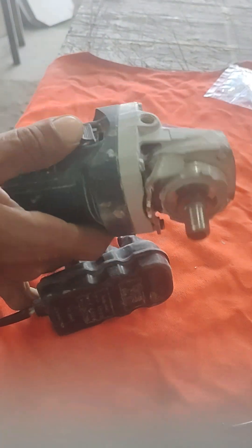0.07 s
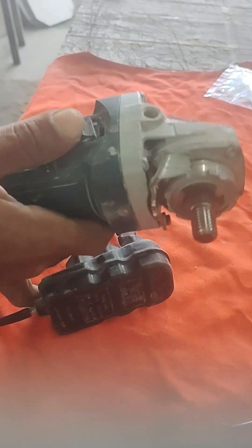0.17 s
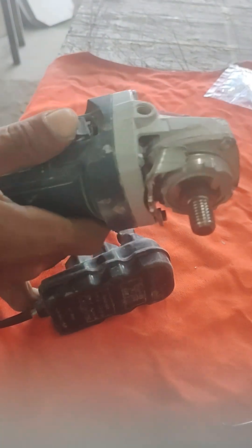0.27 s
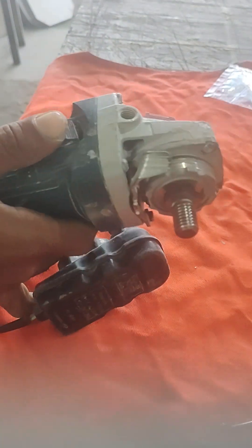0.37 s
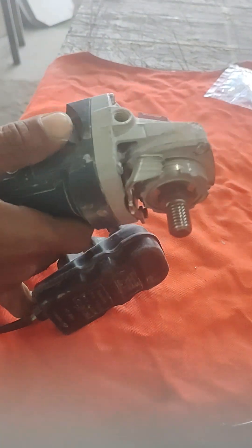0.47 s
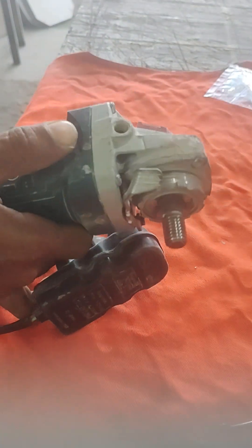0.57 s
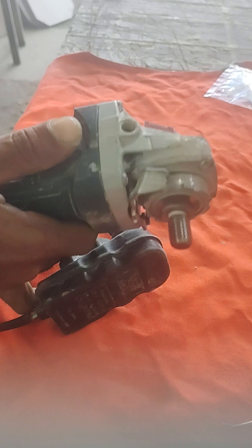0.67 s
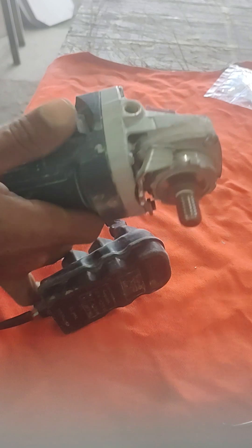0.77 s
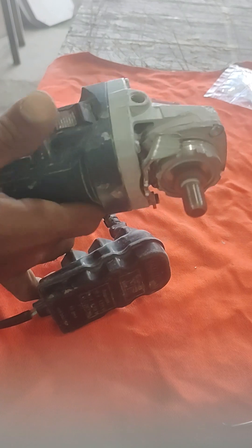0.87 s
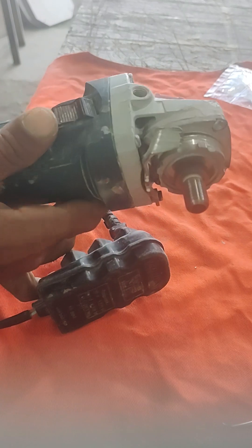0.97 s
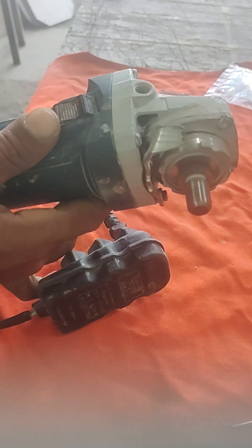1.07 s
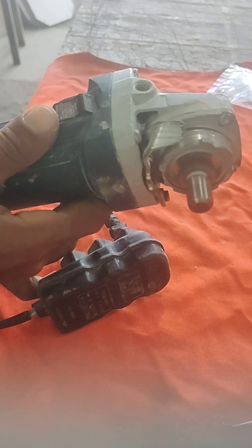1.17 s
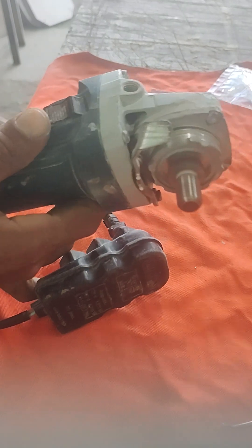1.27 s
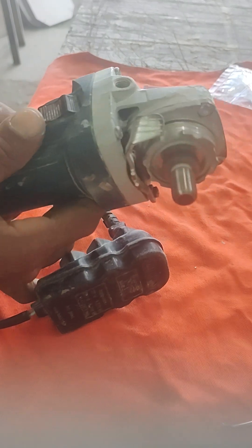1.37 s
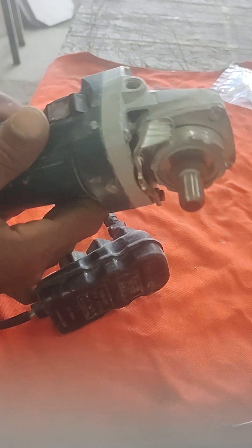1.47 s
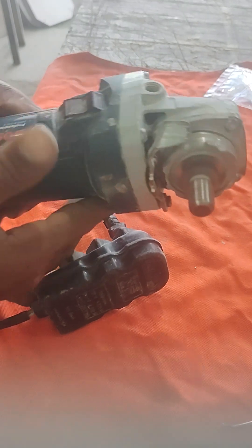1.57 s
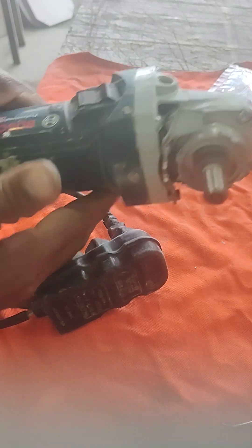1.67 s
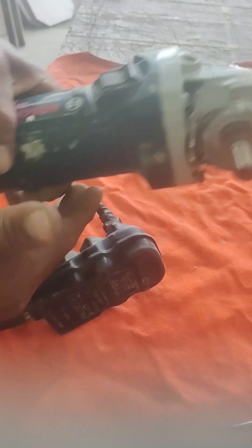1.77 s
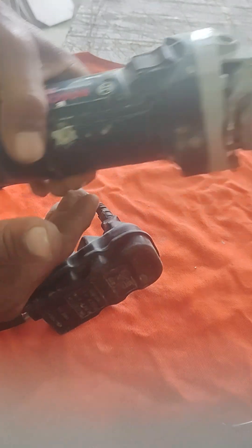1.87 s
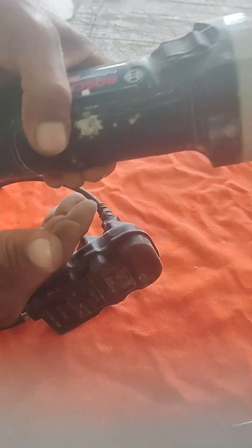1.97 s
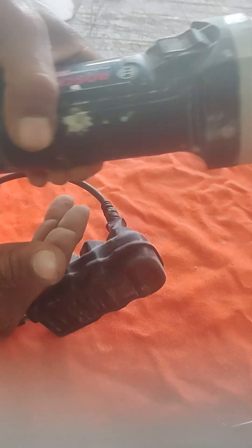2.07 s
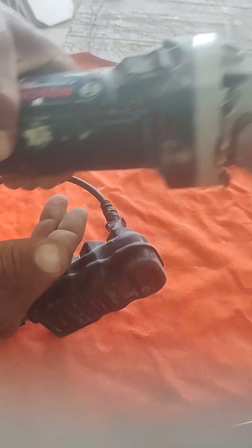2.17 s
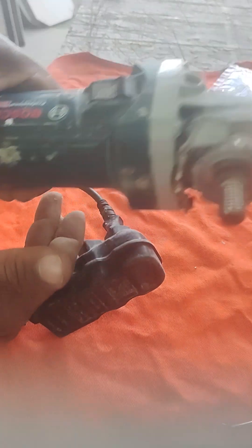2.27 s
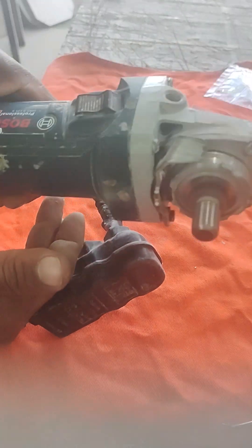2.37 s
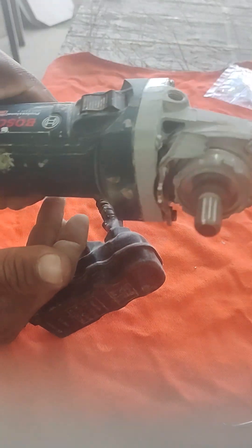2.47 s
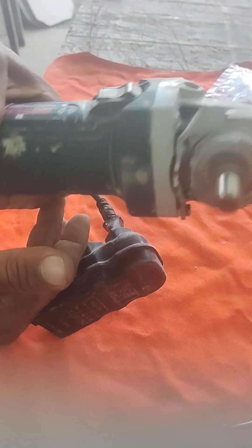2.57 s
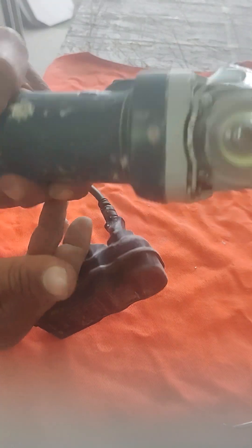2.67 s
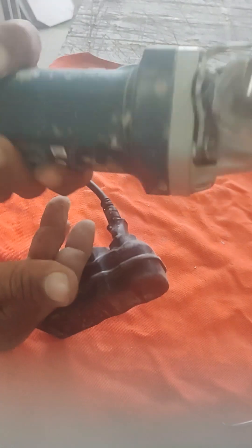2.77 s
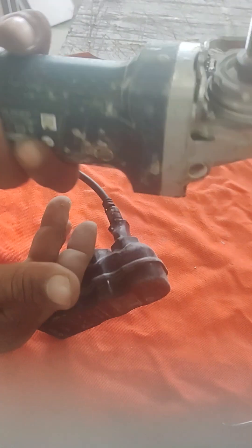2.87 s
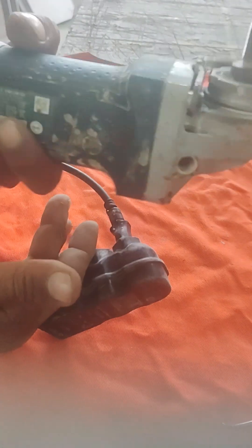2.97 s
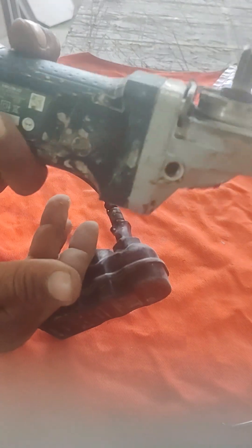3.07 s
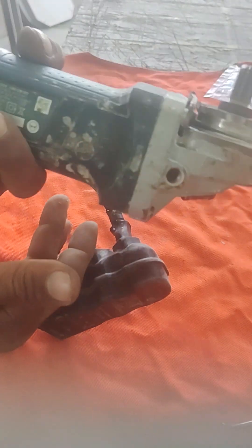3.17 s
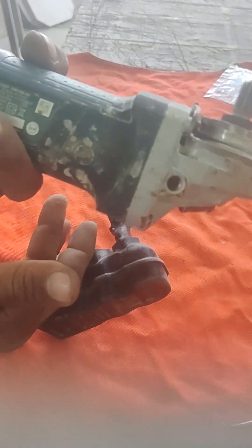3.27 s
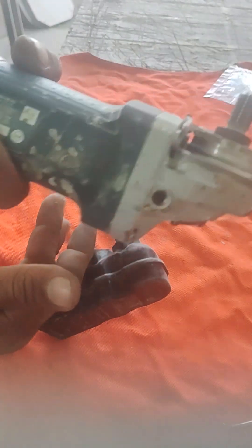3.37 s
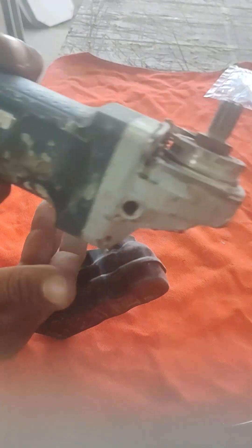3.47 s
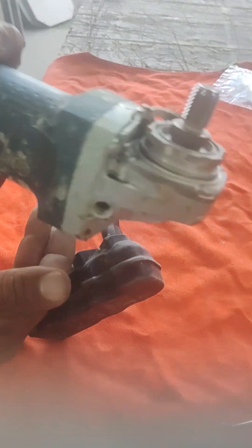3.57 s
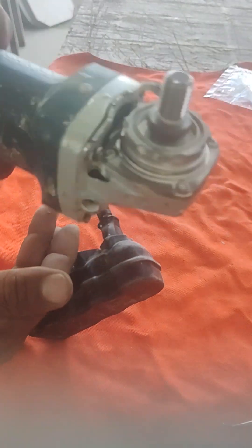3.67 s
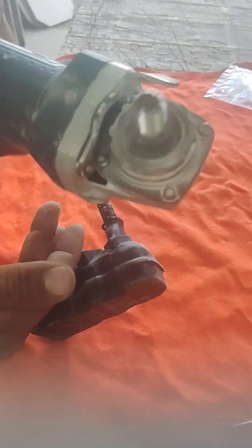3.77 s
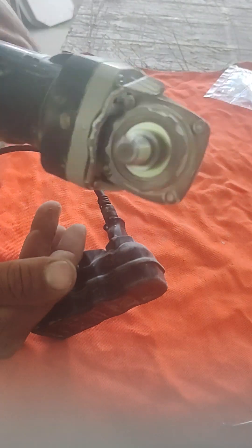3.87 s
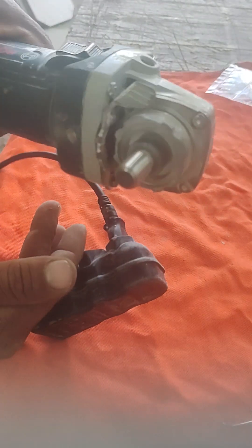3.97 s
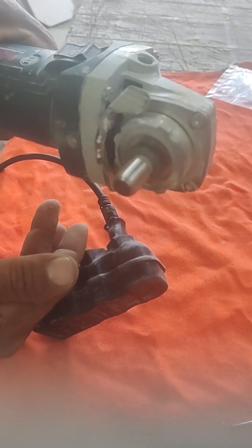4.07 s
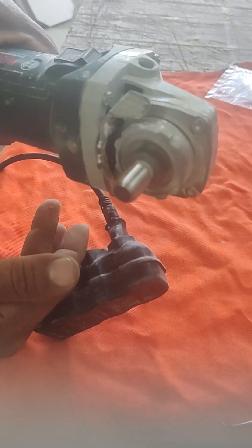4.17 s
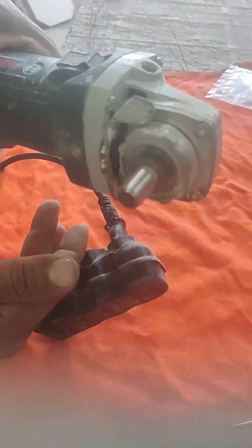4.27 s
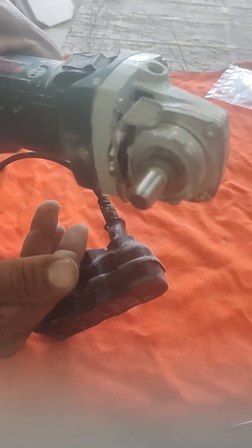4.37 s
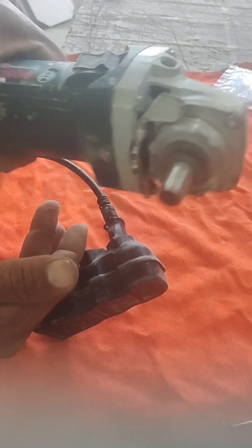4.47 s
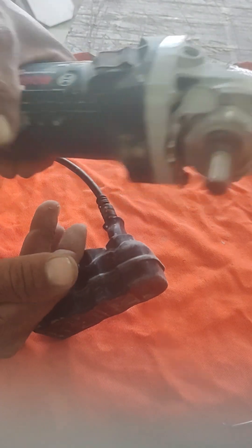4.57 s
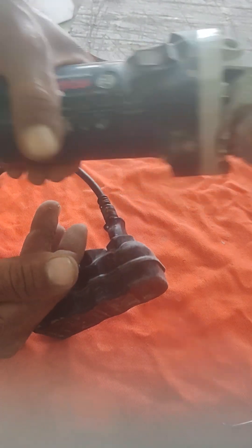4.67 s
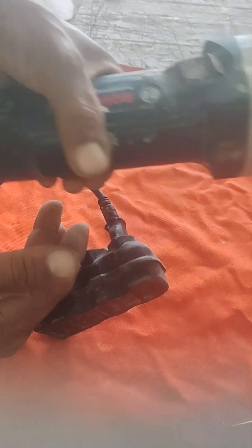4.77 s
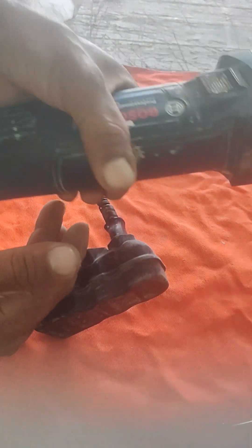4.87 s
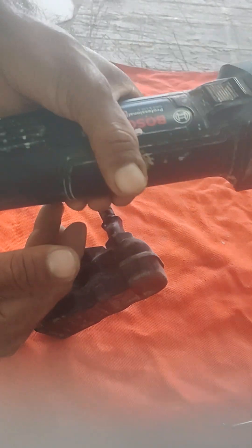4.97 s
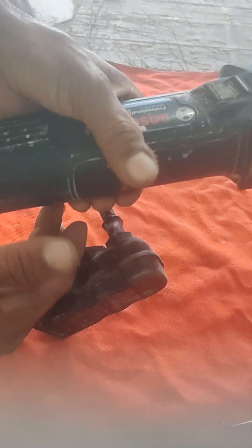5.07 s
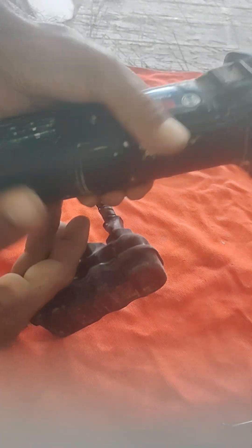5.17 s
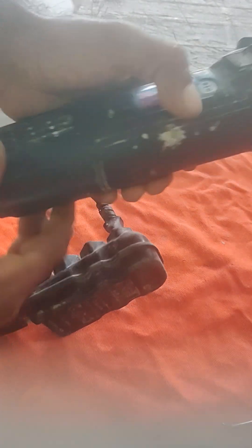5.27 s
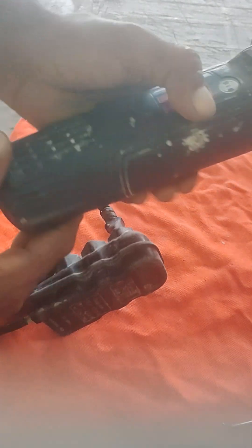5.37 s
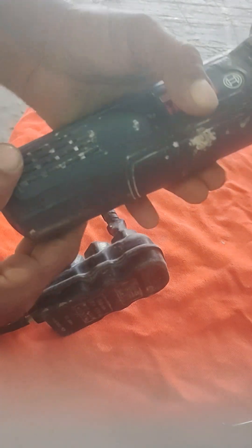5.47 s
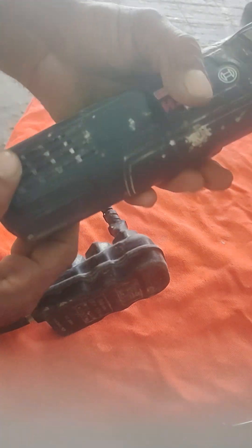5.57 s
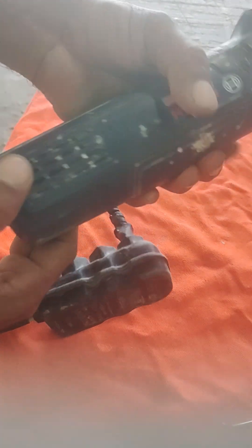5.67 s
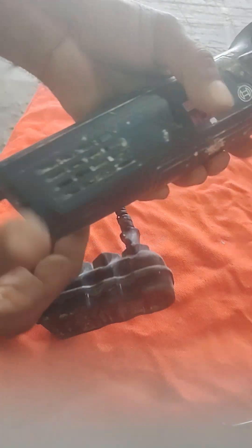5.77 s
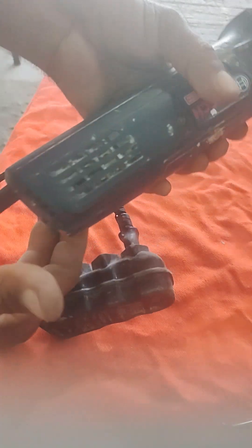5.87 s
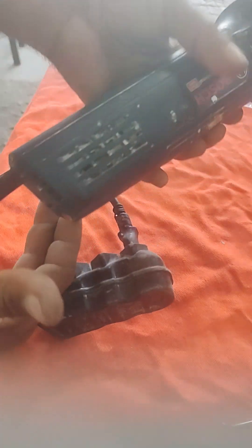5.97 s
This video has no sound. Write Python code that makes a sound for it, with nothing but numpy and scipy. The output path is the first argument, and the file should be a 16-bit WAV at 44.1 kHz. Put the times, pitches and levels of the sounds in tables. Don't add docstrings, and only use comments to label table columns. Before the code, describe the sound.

From 0 to 0.55 seconds a yard is nearly quiet: soft distant rumble, faint hiss, a thin cricket trill toward the right and a tiny far chirp near 0.3. Light finger clicks on a slide switch come at 0.02 and 0.2, with a slight scrape at 0.44. At 0.57 the switch snaps crisply, with quick plastic rebounds. Between 0.74 and 0.83 hard metallic gear knocks rattle as the motor of a discless angle grinder races up, buzzing and throbbing, reaching full speed around 1.1. It then runs very loud and close to the phone through 6 seconds: dense, bright rushing air, a piercing fan whine near ten kilohertz, grainy gear tones around three to four kilohertz and a hum near 420 hertz. Pitch sags slightly by 2 seconds and drifts; tones swell and shift between sides as the tool turns. A soft bump at 3.75 is mostly buried. It ends still running.

```python
import sys
import numpy as np
from scipy import signal
from scipy.fft import rfft, irfft, next_fast_len
from scipy.io import wavfile
from scipy.ndimage import uniform_filter1d, map_coordinates

SR = 44100
rng = np.random.default_rng(int(sys.argv[2]) if len(sys.argv) > 2 else 0)


def waveform_to_disk(signal):
    frames = np.transpose(np.atleast_2d(signal))
    scaled = np.clip(frames, -1, 1) * 32767
    samples = np.round(scaled).astype(np.int16)
    wavfile.write(sys.argv[1], SR, samples)


def undo_db(level):
    steps = np.asarray(level, float) / 20
    return 10 ** steps


N = 265041
T = np.arange(N) / SR
MAINS2_HZ = 120
TOP_HZ = 15750
START_S = .7

# (time [s], depth [0-1])
LOAD = [(.62, .3), (.75, .3), (.85, .4), (.93, .5), (.99, .5), (1.05, .2), (1.2, .08), (6.1, .055)]
# (time [s], amount)
END_ON = [(1.1, -0.11), (1.6, -0.16), (2.7, -0.053), (3.4, -0.64), (4.3, -0.51), (4.7, 0.44), (5.3, 1.1),
          (5.7, 1.85)]


def unit(x):
    return x / np.sqrt(np.mean(x ** 2, -1, keepdims=True) + 1e-20)


def along(points, hz):
    f, v = np.transpose(points)
    return np.interp(np.log(hz + 1), np.log(f + 1), v)


def curves(rows, before=None):
    s, *cols = np.transpose(rows)
    return np.array([np.interp(T, s, c, left=before) for c in cols])


def wobble(rate):
    coarse = T[::32]
    knots = rng.standard_normal(int(N * rate / SR) + 4)
    return np.interp(T, coarse, map_coordinates(knots, [coarse * rate]))


def filtered(x, response):
    m = next_fast_len(N + SR // 2)
    return irfft(rfft(x, m) * response(np.fft.rfftfreq(m, 1 / SR)), m)[..., :N]


def sides(db, pan_db):
    return db + np.array([[.5], [-.5]]) * pan_db


def wobble_pair(rate):
    return np.array([wobble(rate), wobble(rate)])


def rush(patchy_db):
    # (frequency [Hz], likeness [0-1])
    likeness = [(60, 1), (110, 1), (1230, 0.88), (1380, 0.18), (1550, 0.74), (2070, 0.72), (2800, 0.61),
                (3300, 0.45), (6000, 0.054), (7700, 0.043), (9000, 0.053)]
    # (frequency [Hz], phase [rad])
    echo_phase = [(550, -.2), (780, .4), (1050, 0), (1250, -.7), (1380, -2.6), (1550, -5), (2000, -5.9),
                  (2900, -6.5), (3300, -7.6)]
    lead_s = 16 / 44100
    z = signal.stft(rng.standard_normal((2, N)), nperseg=512)[2]
    field = uniform_filter1d(rng.standard_normal(z.shape), 4, 1)
    field = uniform_filter1d(field, 20, 2)
    pair = signal.istft(z * undo_db(patchy_db * field / field.std()), nperseg=512)[1][:, :N]

    def share(hz):
        angle = np.arccos(np.clip(along(likeness, hz), 0, 1)) / 2
        return np.array([np.cos(angle), np.sin(angle)])

    def delay(hz):
        phase = np.pi * hz * lead_s - along(echo_phase, hz) / 2
        return np.exp(1j * phase * np.array([[1], [-1]]))

    mid, side = filtered(pair, share)
    return filtered(np.array([mid + side, mid - side]), delay)


def clicks(events, modes, t60):
    out = np.zeros((2, N + SR))
    t = np.arange(SR // 8) / SR
    fade = undo_db(-60 * t / t60) + 0.17 * undo_db(-60 * t / 0.13)
    for s, db, pan_db in events:
        crack = fade * rng.standard_normal((2, len(t)))
        out[:, round(s * SR):][:, :len(t)] += undo_db(sides(db + 2.5, pan_db)) * crack

    def shell(f):
        total = 0
        for k, (c, w, db) in enumerate(modes):
            total = total + (-1) ** k * undo_db(db) * 1j * f * w / (c * c - f * f + 1j * f * w)
        return total

    return filtered(out[:, :N], shell)


def spin():
    half_speed_s, runup_s = .9, .083
    return 1 / (1 + np.exp((half_speed_s - T) / runup_s))


def speed():
    # (time [s], speed [turns per s])
    free_speed = [(1.05, 443.2), (1.31, 445.6), (1.49, 442.9), (1.93, 426.4), (2.49, 419.4), (2.63, 422.2),
                  (2.89, 424.8), (3.12, 424.8), (3.35, 418.7), (3.82, 416.0), (4.11, 417.3), (4.29, 426.0),
                  (4.52, 423.2), (4.81, 423.9), (5.01, 420.1), (5.24, 422.2), (5.77, 414.8), (6.01, 419.1)]
    return curves(free_speed)[0] * spin()


def throb():
    return 1 + np.clip(curves(LOAD)[0], 0, 1) * np.cos(2 * np.pi * MAINS2_HZ * T - 2)


def yard():
    # (frequency [Hz], level [dB per Hz])
    quiet = [(24, -28), (40, -7), (64, -2), (179, -9.5), (310, -5), (352, -8), (595, -12), (1170, -16),
             (2410, -22), (4730, -22), (5360, -17), (6550, -26), (15700, -37)]
    # (time [s], level [dB])
    cricket = [(0, -73), (.1, -79), (.2, -86), (.35, -72), (.55, -75), (.8, -75)]
    # (time [s], base pitch [Hz], level [dB])
    squeak = [(.25, 3480, -99), (.28, 3720, -90), (.31, 3840, -87), (.34, 3720, -90), (.375, 3450, -99)]
    calm = filtered(rush(patchy_db=1.2), lambda hz: undo_db(along(quiet, hz)))
    floor = undo_db(-67.0) * unit(calm) * undo_db([[-1.2], [1.2]])

    noise = rng.standard_normal((2, N))
    song = unit(filtered(noise, lambda hz: 1 / (1 + ((hz - 5340) / 70) ** 2)))
    trill = undo_db(3 * np.sin(2 * np.pi * 45 * T))
    song = undo_db(curves(cricket)[0] + np.array([[-6], [5]])) * trill * song

    hz, db = curves(squeak)
    phase = 2 * np.pi * np.cumsum(hz) / SR
    sounding = (T > squeak[0][0]) * (T < squeak[-1][0])
    chirp = undo_db(db) * sounding * (np.sin(3 * phase) + np.sin(4 * phase))
    return floor + song + chirp * np.array([[2], [.5]])


def slide_switch():
    # (time [s], peak level [dB], left-right difference [dB])
    snaps = [
        (0.019, -56, -3.5),
        (0.157, -79, -7),
        (0.195, -58, -3.5),
        (0.444, -66, -5.0),
        (0.567, -35, -1),
        (0.576, -40, 1),
        (0.587, -38, -6),
        (0.596, -46, -6),
    ]
    # (frequency [Hz], width [Hz], level [dB])
    housing = [(700, 540, -4), (2760, 400, 5), (3700, 600, -1), (5600, 1100, -2.5), (10900, 7800, -13)]
    return clicks(snaps, housing, t60=0.016)


def colour(hz):
    # (frequency [Hz], level [dB per Hz])
    roar_left = [(150, -29), (370, -17), (520, -15), (640, -12.5), (1000, -6.5), (1250, -3), (2200, -6.5),
                 (2900, 4.5), (3600, -5), (4400, -3.5), (5500, -4.5), (6500, -9), (8300, -5.5),
                 (11500, -13)]
    # (frequency [Hz], level [dB per Hz])
    roar_right = [(150, -30.5), (370, -17), (620, -17), (900, -8), (1230, -2.5), (1400, -8), (1900, -1.5),
                  (2250, -2.5), (3300, 2), (4350, -3.5), (6150, 0.5), (6450, -2.5), (8600, -10),
                  (11500, -16)]
    # (frequency [Hz], half width [Hz], left level [dB], right level [dB])
    ridge_table = [(623.3, 4.7, 6, 13), (1354, 38, 2.5, 1), (1904, 230, 5, 2), (2460, 130, 0.5, 3),
                   (3520, 103, 5, 3.5), (4000, 130, 5.5, -1.5), (4610, 130, -0.5, 3), (13700, 1800, 2.5, 5)]
    bottom = [(20, -59), (60, -38.5)]
    left = along(bottom + roar_left + [(TOP_HZ, -10)], hz)
    right = along(bottom + roar_right + [(TOP_HZ, -17)], hz)
    ridges = 0
    for centre, width, *db in ridge_table:
        ridges = ridges + np.outer(db, 1 / (1 + ((hz - centre) / width) ** 2))
    return undo_db(np.array([left, right]) + ridges)


def roar():
    # (time [s], level against free running [dB])
    build_up = [(.62, -55), (.7, -44), (.74, -35), (.78, -22), (.81, -15), (.87, -6.5), (.95, -2), (1, -2),
                (1.1, 0)]
    # (time [s], level [dB], left-right difference [dB])
    facing = [(1.1, -15.5, -1.5), (1.3, -15, -1), (1.7, -16.3, -2.5), (2.0, -15.5, -1.5), (2.47, -16, -.5),
              (2.7, -15.5, -2), (3.08, -15.5, -2), (3.16, -18.5, -2.5), (3.45, -15.5, -2), (3.7, -15, -1.5),
              (4.2, -16, -2.5), (4.47, -17, -1), (4.7, -16, -1), (5.05, -15.5, -2), (5.5, -16, -0.5),
              (5.75, -15.5, -1), (6.01, -16.5, -2.5)]
    # (frequency [Hz], half width [Hz], gain per amount)
    vents = [(1390, 140, -0.29), (1960, 130, 0.21), (2900, 180, -0.084), (4100, 130, 0.082)]
    db, pan_db = curves(facing)
    load = curves(LOAD)[0]
    away_db = 0.19 * (np.median(db) - db)
    low_db = 1.1 + away_db + 20 * np.log10(np.maximum(0.081 / spin(), 1))
    high_db = -0.33 + away_db + 24 * np.log10(spin()) + 0.7 * wobble(3.44)

    noise = unit(filtered(rush(patchy_db=0.71), colour))
    low = filtered(noise, lambda hz: 1 / (1 + (hz / 1900) ** 6))
    high = filtered(noise, lambda hz: 1 - 1 / (1 + (hz / 8500) ** 6))
    upper = filtered(noise - high, lambda hz: 1 - 1 / (1 + (hz / 3900) ** 8))
    bright = undo_db(np.clip(45 * np.log10(speed() / 400), -11, 0))
    body = noise - low - high - upper + undo_db(low_db) * low + bright * upper

    def vent_change(hz):
        return sum(gain / (1 + ((hz - c) / w) ** 4) for c, w, gain in vents)

    body = body + curves(END_ON)[0] * filtered(noise, vent_change)
    case = filtered(noise, lambda hz: 1 / (1 + ((hz - 2700) / 280) ** 4))
    body = body + .8 * load * case
    rattle = undo_db(1.8 * load * wobble(70) + 0.36 * wobble(14))
    body = body * throb() * rattle + undo_db(high_db) * high
    level = undo_db(sides(db + 3 + curves(build_up)[0], pan_db + 0.9))
    return level * body * (T > build_up[0][0])


def hum():
    # (time [s], level [dB])
    core_hum = [(.66, -85), (.74, -70), (.84, -63), (1.0, -55), (1.08, -75), (1.2, -75)]
    db = curves(core_hum, before=-93)[0] - 60 * np.clip(T - 1.2, 0, .15)
    return np.sqrt(2) * undo_db(db) * np.sin(2 * np.pi * MAINS2_HZ * T)


def tone(order, turns, db, lead, flutter_db):
    phase = 2 * np.pi * order * turns + rng.uniform(0, 2 * np.pi)
    flutter = flutter_db * (wobble(18) + .6 * wobble_pair(30))
    return np.sqrt(2) * undo_db(db + flutter) * np.sin(phase + sides(0, lead))


def unbalance_hum(turns, decade):
    # (time [s], level [dB], left-right difference [dB], left lead [rad])
    unbalance = [(1.1, -32.5, -1, 1.1), (1.3, -34, -1, .8), (1.5, -37, -2, .8), (1.72, -43, -6, .4),
                 (2.2, -36.5, -4, 1), (2.6, -39, -3.5, 1), (2.85, -43, -3, 2.2), (3.3, -42, 1, 2.2),
                 (3.65, -40.5, -1, 2.3), (4.05, -37.3, -1, 1.1), (4.45, -41, -4, 1), (5.1, -32, 0, 1),
                 (5.45, -32.7, 4.5, 1.3), (5.62, -35.8, 3, 1.7), (6, -31.5, 4, 1.4)]
    db, pan_db, lead = curves(unbalance)
    return tone(1, turns, sides(db + 75 * decade, pan_db), lead, flutter_db=.6)


def fan_whine(turns, decade):
    # (time [s], level [dB], left-right difference [dB], left lead [rad])
    blade = [(1.045, -13, 6, .6), (1.11, -23, 1, -1), (1.4, -27.5, -2.5, -3.3), (1.78, -22.5, 1.5, 0),
             (2.5, -23.8, -1.1, -2.2), (2.9, -25.5, 3.5, -.9), (3.01, -18.3, .9, -1),
             (3.23, -24.2, -.6, -2), (3.41, -24.1, 10, -6.5), (3.58, -23.6, 6.9, -2.6),
             (3.78, -18.8, 1, -3), (4.07, -24.6, 3.5, -3.1), (4.3, -23.5, -6.9, -.5),
             (4.71, -23.3, 1.2, -.3), (4.97, -26.4, 8.4, -1.2), (5.32, -24.2, -5.1, -2.6),
             (5.78, -25.8, 8, -3.2), (6.01, -26, -3, -.5)]
    db, pan_db, lead = curves(blade)
    turbulence = 1 + .22 * wobble_pair(600)
    level_db = sides(db - .7 + 125 * decade, pan_db + 2 * wobble(6))
    return turbulence * tone(23, turns, level_db, lead + .35 * wobble(10), flutter_db=1.9)


def gear_tones(turns, rate, decade):
    # (order [per turn], left level [dB], right level [dB], left lead [rad], torque swell [dB])
    gear_orders = [(8, -37, -34.5, 1.8, 0), (9, -36.5, -34, .5, 8), (12, -39, -38, 1.3, 17)]
    # (time [s], half length [s], level [dB])
    gear_near = [
        (3.4, .4, 5),
        (5.25, .3, 5.5),
    ]
    ring_hz, ring_width_hz = 3600, 1000
    torque = np.clip(curves(LOAD)[0] / .4, 0, 1)
    near_db = sum(db * np.exp(-((T - s) / half) ** 2) for s, half, db in gear_near)
    out = np.zeros((2, N))
    for order, left_db, right_db, lead, swell_db in gear_orders:
        ring_db = torque * swell_db / (1 + ((order * rate - ring_hz) / ring_width_hz) ** 8)
        db = np.array([[left_db], [right_db]]) + 30 * decade + ring_db
        db = db + near_db * (order < 10) + 1.5 * (1 - torque) * wobble_pair(3)
        wander = lead * (1 - torque / 2) + .4 * (1 - torque) * wobble(3)
        chatter = 1 + .6 * wobble(200)
        out += chatter * throb() ** 2 * tone(order, turns, db, wander, flutter_db=2.2)
    return out


def weak_tones(turns, rate):
    # (order [per turn], left level [dB], right level [dB], left lead [rad])
    weak_orders = [(3, -37, -33, -2.8), (6, -41, -35, -.2), (7, -36, -39, .8), (8.715, -43, -44, -.6),
                   (9.715, -43, -39, -2.2), (10, -39, -36, -1.2), (11, -38, -45, -.9), (13, -44, -38, .2),
                   (22, -45, -47, -2.7), (24, -45, -49, .3)]
    rear_db = 8 * np.maximum(curves(END_ON)[0] - 1, 0)
    spin_db = 40 * np.log10(rate / 420)
    out = np.zeros((2, N))
    for order, left_db, right_db, lead in weak_orders:
        db = np.array([[left_db], [right_db]]) + spin_db + rear_db * (order == 10) + 2.2 * wobble(3)
        out += tone(order, turns, db, lead + .3 * wobble(2), flutter_db=3.5)
    return out


def whine():
    rate, decade = speed(), np.log10(spin())
    turns = np.cumsum(rate * (1 + .0006 * wobble(30))) / SR
    out = unbalance_hum(turns, decade) + fan_whine(turns, decade)
    out = out + gear_tones(turns, rate, decade) + weak_tones(turns, rate)
    return out * (T > START_S)


def gear_knocks():
    # (time [s], peak level [dB], left-right difference [dB])
    knocks = [
        (0.743, -34, 1),
        (0.753, -26.5, 2),
        (0.761, -29.5, 0),
        (0.770, -22.5, 2),
        (0.801, -16, 9),
        (0.818, -24, 3),
        (0.828, -22, -4),
    ]
    # (frequency [Hz], width [Hz], level [dB])
    gearcase = [(1080, 310, 2), (2800, 270, 6), (3900, 900, -14)]
    return 1.36 * clicks(knocks, gearcase, t60=0.014)


def bumps():
    # (time [s], level [dB])
    thumps = [
        (3.75, -39),
    ]
    out = 0
    for s, db in thumps:
        v = np.clip((T - s) / 0.0021, -9, 9)
        out = out + undo_db(db) * np.sin(1.8 * v) * np.exp(-v * v / 9)
    return out


def scene():
    return yard() + slide_switch() + roar() + hum() + whine() + gear_knocks() + bumps()


def band_limit(x):
    return signal.sosfilt(signal.butter(12, 16990, fs=SR, output="sos"), x)


def record(dry):
    x = filtered(dry, lambda hz: 1 / (1 + np.exp(np.clip((hz - TOP_HZ) / 25, -50, 50))))
    mix = np.clip(x, -1, 1)
    return band_limit(mix)


dry = scene()
out = record(dry)
waveform_to_disk(out)
```